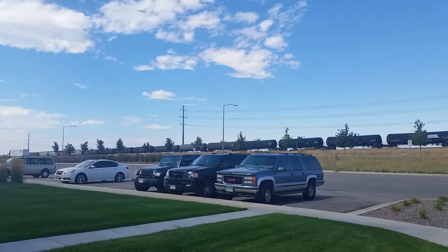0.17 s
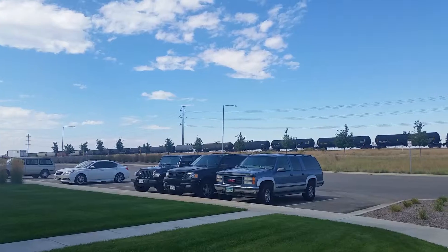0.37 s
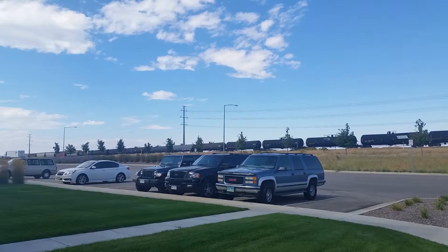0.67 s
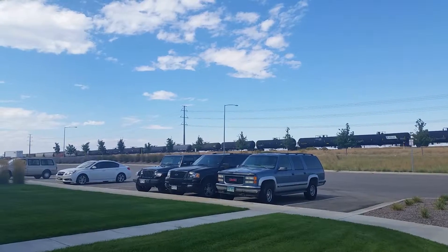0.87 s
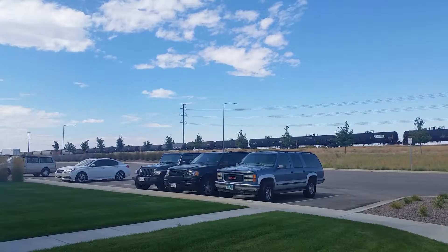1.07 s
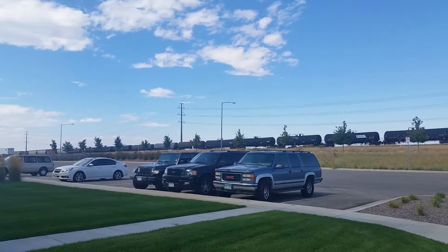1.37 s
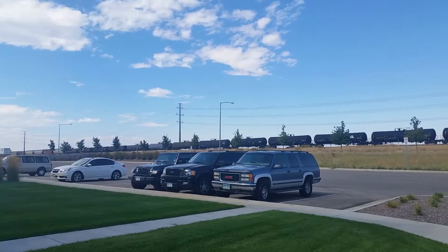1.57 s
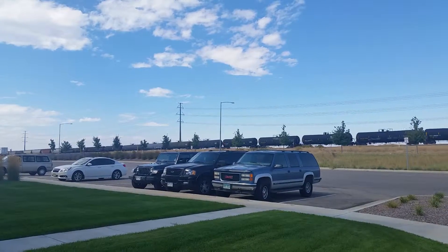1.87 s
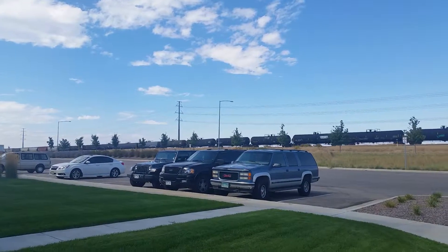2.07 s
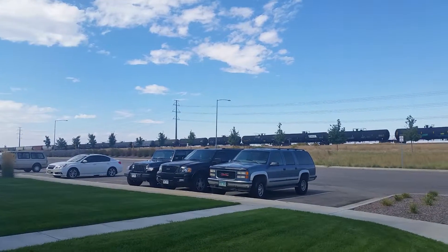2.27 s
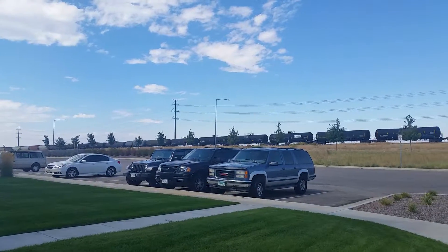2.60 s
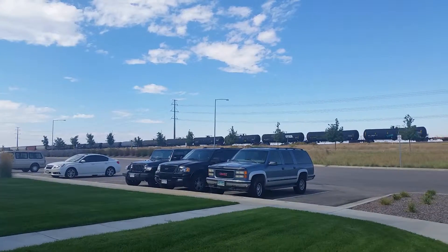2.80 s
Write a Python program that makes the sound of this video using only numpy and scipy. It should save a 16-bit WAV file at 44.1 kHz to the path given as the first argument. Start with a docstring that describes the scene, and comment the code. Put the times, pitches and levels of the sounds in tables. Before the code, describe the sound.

Distant heavy rail wagons rumble unevenly past an open car park, wheels rushing softly over rails.

```python
"""A car park, with a freight train rolling in the distance, heard by a microphone with two ports.
Filtered noise makes the deep rumble of heavy wagons, the rush of wheels on rails and a thin high hiss.
Two wavering tones hum, short bursts of noise are soft coupling rattles, brief tones are flange squeals.
Light wind stirs each port by itself; the right port is shaded and loses much of the treble.
"""
import sys
import numpy as np
from scipy import signal
from scipy.fft import rfft, irfft, next_fast_len
from scipy.io import wavfile
from scipy.ndimage import uniform_filter1d, map_coordinates

SR = 44100
rng = np.random.default_rng(int(sys.argv[2]) if len(sys.argv) > 2 else 0)


def generate_wav(sig):
    """Save sig (samples, or channels by samples) to the path in sys.argv[1] as 16-bit PCM at SR."""
    pcm = np.round(np.clip(np.atleast_2d(sig).T, -1, 1) * 32767).astype(np.int16)
    wavfile.write(sys.argv[1], SR, pcm)


N = 129654  # length in samples


def amp(db):
    """Decibels to gain."""
    return 10 ** (np.asarray(db) / 20)


def unit(x):
    """Scale to rms 1."""
    return x / np.sqrt(np.mean(x ** 2) + 1e-20)


def along(points, hz):
    """Read (frequency, value) points on a log frequency axis."""
    point_hz, values = np.transpose(points)
    return np.interp(np.log(hz + 1), np.log(point_hz + 1), values)


def curves(rows):
    """One value per sample for each column after the time."""
    time_s, *columns = np.transpose(rows)
    t = np.arange(N) / SR
    return [np.interp(t, time_s, column) for column in columns]


def wobble(rate):
    """A smooth random curve with this many knots a second."""
    knots = rng.standard_normal(int(N * rate / SR) + 4)
    return map_coordinates(knots, [np.arange(N) * rate / SR])


def filtered(x, response):
    """Multiply the spectrum of x by a response, which is a function of frequency."""
    size = next_fast_len(N + SR // 2)
    return irfft(rfft(x, size) * response(np.fft.rfftfreq(size, 1 / SR)), size)[..., :N]


# Likeness of far sound at the two ports: pitch_hz, likeness (0-1)
PORT_LIKENESS = [(30, .85), (60, 0.98), (120, 0.97), (220, 0.98), (330, 0.95), (400, 0.9), (540, 0.5),
                 (700, 0.8), (1000, 0.65), (1100, 0.5), (1450, 0.6), (1700, .65), (1850, .45), (2100, 0.8),
                 (2450, 0.1), (2850, 0.6), (4000, 0), (8000, 0.2)]


def noise_pair(spectrum, patchy_db, far=True):
    """Coloured noise of rms 1 with patches of random gain; far sound is partly shared by the ports."""
    grid = signal.stft(rng.standard_normal((2, N + SR // 10)), nperseg=1024)[2]
    patches = uniform_filter1d(rng.standard_normal(grid.shape[1:]), size=8, axis=0)  # across frequency
    patches = uniform_filter1d(patches, size=6, axis=1)  # across time
    pair = signal.istft(grid * amp(patchy_db * unit(patches)), nperseg=1024)[1]
    pair = pair[:, SR // 20:][:, :N]

    def mid_side(hz):
        # the cosine of twice this angle is the correlation of the ports
        angle = np.arccos(np.clip(along(PORT_LIKENESS, hz) * far, -1, 1)) / 2
        return amp(along(spectrum, hz)) * [np.cos(angle), np.sin(angle)]

    mid, side = filtered(pair, mid_side)
    return unit(np.array([mid + side, mid - side]))


EVEN_S, EVEN_SHARE = 0.045, 0.78  # averaging time; share of the power swells taken out (0-1)


def even(x):
    """Partly level the noise's chance swells, so that the level curves shape the rumble."""
    power = np.abs(uniform_filter1d(np.mean(x ** 2, axis=0), int(EVEN_S * SR))) + 1e-3
    return unit(x * power ** (-EVEN_SHARE / 2))


# Rumble levels before each band's trim: time_s, level_db
DEEP_RUMBLE_LEVEL = [(0.02, -27), (0.13, -29), (0.21, -17), (0.24, -29.5), (0.46, -21), (0.49, -27),
                     (0.56, -21), (0.75, -29.5), (0.81, -21), (0.84, -36.5), (0.87, -24), (1.09, -23),
                     (1.11, -34), (1.15, -16.5), (1.25, -29), (1.36, -22), (1.85, -24.5), (1.89, -19.5),
                     (1.97, -27), (2.15, -19.5), (2.2, -35), (2.26, -24), (2.31, -32.5), (2.35, -25.5),
                     (2.6, -29.5), (2.65, -19.5), (2.72, -34), (2.87, -17.5), (2.89, -25.5), (2.92, -17.5)]
MIDDLE_RUMBLE_LEVEL = [(0.02, -22), (0.04, -29.5), (0.14, -23.5), (0.17, -30.5), (0.2, -17.5),
                       (0.35, -22.5), (0.37, -27.5), (0.46, -23), (1.02, -26.5), (1.16, -21), (1.18, -30),
                       (1.23, -19), (1.3, -28), (1.33, -18.5), (1.46, -28), (1.55, -20), (1.63, -36.5),
                       (1.65, -26), (1.8, -23), (1.87, -32.5), (1.9, -21.5), (1.93, -31), (1.97, -21.5),
                       (2.14, -28.5), (2.6, -24), (2.62, -29), (2.69, -18.5), (2.72, -29), (2.79, -20.5),
                       (2.92, -25.5)]
UPPER_RUMBLE_LEVEL = [(0.02, -20.5), (0.16, -27), (0.21, -21.5), (0.38, -25), (0.41, -21.5), (0.54, -29),
                      (0.56, -24.5), (0.83, -24), (0.85, -30), (0.91, -26.5), (1.39, -23.5), (1.41, -30.5),
                      (1.53, -22), (1.59, -27.5), (1.76, -23), (1.88, -29), (1.9, -24), (1.97, -27),
                      (2.09, -22.5), (2.16, -28), (2.28, -22), (2.31, -25.5), (2.77, -22), (2.78, -25),
                      (2.9, -25), (2.92, -21)]
# Rumble colours, relative: pitch_hz, level_db (per Hz)
DEEP_RUMBLE_SPECTRUM = [(15, -48), (30, -19.5), (48, -13), (62, 2), (85, -2), (105, -11), (140, -20.5),
                        (300, -120)]
MIDDLE_RUMBLE_SPECTRUM = [(40, -67), (80, -15), (100, -1.5), (125, -1), (150, -7), (190, -25.5),
                          (400, -120)]
UPPER_RUMBLE_SPECTRUM = [(70, -72.5), (125, -27), (155, -4), (180, 0), (205, -5), (240, -9.5), (300, -11),
                         (390, -22), (520, -31), (900, -60), (2000, -120)]


def wagon_rumble():
    """Heavy wagons as three bands of low noise, each evened out and then given its own level curve."""
    deep_db, = curves(DEEP_RUMBLE_LEVEL)
    middle_db, = curves(MIDDLE_RUMBLE_LEVEL)
    upper_db, = curves(UPPER_RUMBLE_LEVEL)
    deep = amp(deep_db - 0.15) * even(noise_pair(DEEP_RUMBLE_SPECTRUM, patchy_db=-0.1))
    middle = amp(middle_db - 0.45) * even(noise_pair(MIDDLE_RUMBLE_SPECTRUM, patchy_db=0.5))
    upper = amp(upper_db - 0.9) * even(noise_pair(UPPER_RUMBLE_SPECTRUM, patchy_db=0.56))
    return deep + middle + upper


# Rush levels before trim and wavering.
# Low and high rush: time_s, low level_db, high level_db
LOW_HIGH_RUSH_LEVEL = [(0.02, -40.5, -47.5), (0.04, -38, -48), (0.35, -36.5, -46), (0.76, -40, -49.5),
                       (0.79, -39, -47), (0.92, -37.5, -49), (0.97, -37, -44.5), (1.06, -40, -48),
                       (1.61, -39, -48.5), (1.63, -44.5, -47.5), (1.68, -38.5, -49.5), (1.71, -38.5, -47),
                       (1.86, -41.5, -49.5), (1.87, -38.5, -48.5), (2.89, -38.5, -48.5), (2.92, -42.5, -48)]
# Middle rush: time_s, level_db
MIDDLE_RUSH_LEVEL = [(0.03, -41), (0.4, -40), (0.55, -40), (0.88, -41.5), (0.97, -42), (1.08, -42),
                     (1.6, -42.5), (1.76, -41.5), (2.1, -43), (2.36, -42), (2.43, -40), (2.55, -40.5),
                     (2.9, -41)]
# Bands beside the high rush: time_s, level_db under it, level_db over it
EDGE_RUSH_LEVEL = [(0.04, -55.5, -65.5), (0.39, -49.5, -62), (0.86, -51.5, -67), (0.96, -49, -67.5),
                   (0.98, -41, -66), (0.99, -47, -62), (1.45, -50.5, -65.5), (1.53, -54.5, -69.5),
                   (2.08, -49.5, -64.5), (2.12, -52.5, -65.5), (2.4, -54, -67.5), (2.41, -49, -64.5),
                   (2.56, -54, -67.5), (2.9, -54, -68)]
# Rush colours, relative: pitch_hz, level_db (per Hz)
LOW_RUSH_SPECTRUM = [(200, -52), (450, -16), (600, -4), (850, 0.5), (1050, -3), (1300, -7.5), (2000, -32.5),
                     (4000, -120)]
MIDDLE_RUSH_SPECTRUM = [(500, -55), (1000, -10.5), (1300, -4.5), (1550, -3), (1700, -1), (1950, -4.5),
                        (2100, -5.5), (2300, -7.5), (2600, -17.5), (2900, -32.5), (4000, -60.5),
                        (8000, -120)]
UNDER_RUSH_SPECTRUM = [(1500, -61), (2200, -9), (2550, -2.5), (2900, -6.5), (3200, -8), (4500, -61),
                       (9000, -120)]
HIGH_RUSH_SPECTRUM = [(1500, -70), (2900, -14.5), (3500, -2), (4200, -2.5), (5000, -11), (5800, -19.5),
                      (7000, -49.5), (9000, -120)]
OVER_RUSH_SPECTRUM = [(3000, -69.5), (5000, -7.5), (5800, -1), (6500, -4.5), (7400, -11), (8100, -37),
                      (9000, -56.5), (12000, -120)]


def wheel_rush():
    """Wheels rolling on rails as five bands of patchy noise that waver slightly together."""
    low_db, high_db = curves(LOW_HIGH_RUSH_LEVEL)
    middle_db, = curves(MIDDLE_RUSH_LEVEL)
    under_db, over_db = curves(EDGE_RUSH_LEVEL)
    low = amp(low_db + 1.94) * noise_pair(LOW_RUSH_SPECTRUM, patchy_db=0.47)
    middle = amp(middle_db + 5) * noise_pair(MIDDLE_RUSH_SPECTRUM, patchy_db=0.97)
    under = amp(under_db + 1.5) * noise_pair(UNDER_RUSH_SPECTRUM, patchy_db=0.8)
    high = amp(high_db + 6.0) * noise_pair(HIGH_RUSH_SPECTRUM, patchy_db=0.84)
    over = amp(over_db + 6.0) * noise_pair(OVER_RUSH_SPECTRUM, patchy_db=1.4)
    shared_db = 0.4 * wobble(9.45)
    return amp(shared_db) * (low + middle + under + high + over)


# Hum levels before the flutter: time_s, upper level_db, lower level_db
HUM_LEVELS = [(0.03, -62, -56), (0.22, -49, -52), (0.32, -61.5, -58), (0.7, -52.5, -57.5),
              (0.86, -47.5, -51.5), (1.15, -50, -45), (1.3, -49, -55), (1.53, -42.5, -60.5),
              (1.6, -48, -53.5), (1.75, -49, -54.5), (1.9, -58.5, -58), (2.25, -62, -46),
              (2.57, -56.5, -55), (2.66, -42, -42.5), (2.79, -43, -61), (2.9, -54.5, -55)]
HUM_HZ = (451.8, 414.3)  # centre pitches, upper and lower
HUM_DRIFT_HZ, HUM_FLUTTER_DB = 3, 2.5  # scales of the random drift and flutter


def hums():
    """Two narrow tones that drift in pitch, flutter and swell, alike at both ports."""
    total = np.zeros(N)
    for centre_hz, level_db in zip(HUM_HZ, curves(HUM_LEVELS)):
        pitch_hz = centre_hz + HUM_DRIFT_HZ * wobble(8)
        tone = np.sqrt(2) * np.sin(2 * np.pi * np.cumsum(pitch_hz) / SR)  # rms 1
        total += amp(level_db + HUM_FLUTTER_DB * wobble(15)) * tone
    return total


# Hiss level before its trim: time_s, level_db
HISS_SWELL = [(0.03, -82), (0.13, -80), (0.31, -73.5), (0.75, -77), (1.0, -71.5), (1.2, -71.5), (1.36, -72),
              (1.47, -81.5), (1.89, -85), (1.99, -77), (2.05, -72.5), (2.2, -82), (2.9, -82)]
# Hiss colour, relative: pitch_hz, level_db (per Hz)
HISS_SPECTRUM = [(8000, -82), (11000, -22), (12000, -7), (12800, -3), (13800, -10.5), (15000, -29),
                 (20000, -80.5)]


def hiss():
    """A thin band of high, patchy noise that swells and fades."""
    level_db, = curves(HISS_SWELL)
    return amp(level_db + 4.5) * noise_pair(HISS_SPECTRUM, patchy_db=3.0)


# Wind colour, relative: pitch_hz, level_db (per Hz)
WIND_SPECTRUM = [(10, -14.5), (35, -8.5), (70, -8), (150, -19), (400, -42), (1000, -120)]
WIND_DB = -38  # level before the gusting


def wind():
    """Light wind as low buffeting noise, independent at each port and in its gusting."""
    gusts_db = 2.0 * np.array([wobble(7.1), wobble(5.4)])
    return amp(WIND_DB + gusts_db) * noise_pair(WIND_SPECTRUM, patchy_db=3.5, far=False)


# Far coupling rattles, before their roughness: time_s of the middle, level_db
COUPLING_RATTLES = [(0.975, -49.5), (2.04, -53), (2.43, -47)]
# Rattle colour, relative: pitch_hz, level_db (per Hz)
RATTLE_SPECTRUM = [(300, -60), (1000, -5.5), (1800, 0.5), (2800, -5.5), (4000, -5.5), (5500, -14),
                   (7400, -27), (8200, -54), (12000, -120)]
RATTLE_S = 0.02  # from the middle of a burst to 1/e of its gain


def rattles():
    """Couplings rattle softly: short bell-shaped bursts of noise, made rough by a fast random gain."""
    t = np.arange(N) / SR
    swell = sum(amp(db) * np.exp(-((t - middle_s) / RATTLE_S) ** 2) for middle_s, db in COUPLING_RATTLES)
    return swell * amp(3 * wobble(170)) * noise_pair(RATTLE_SPECTRUM, patchy_db=1.0)


# Flange squeals, before their unsteadiness: start_s, length_s, pitch_hz, level_db (peak)
FLANGE_SQUEALS = [(1.15, .095, 6715, -58.5), (2.41, 0.075, 7355, -61)]
SQUEAL_RISE_S = 0.015  # fade at either end


def squeals():
    """Wheel flanges squeal faintly: short tones, slightly unsteady in level and phase."""
    t = np.arange(N) / SR
    total = np.zeros(N)
    for start_s, length_s, pitch_hz, level_db in FLANGE_SQUEALS:
        to_nearest_end_s = np.minimum(t - start_s, start_s + length_s - t)
        fade = np.clip(to_nearest_end_s / SQUEAL_RISE_S, 0, 1)
        tone = np.sin(2 * np.pi * pitch_hz * t + 0.6 * wobble(56))
        total += amp(level_db + 1.5 * wobble(50)) * fade * tone
    return total


def scene():
    """All sources summed before the microphone's own lag, shading and noise."""
    return wagon_rumble() + wheel_rush() + hums() + hiss() + wind() + rattles() + squeals()


# Phase by which the left port lags: pitch_hz, lag (radians)
LEFT_LAG = [(40, .1), (350, .05), (450, 0.38), (780, .2), (950, .8), (1100, 2.12), (1400, 1.2),
            (1750, 2.86), (2100, 5.48), (2450, 4.5), (2900, 5.8), (3300, 9.3), (5400, 25)]
# Gain of the shaded right port: pitch_hz, level_db
RIGHT_SHADE = [(30, -1.2), (90, 1.53), (200, 2), (330, 1.5), (500, 2.1), (700, 0.45), (950, -3),
               (1200, 0.2), (1550, -6.5), (2000, -0.5), (2300, -5.5), (2600, 0.5), (2900, -3.5),
               (3300, -15), (4000, -23.5), (5000, -17), (7000, -16.5), (7500, -22.5), (9000, 4),
               (12700, -6.5), (15000, -9.5)]
# Self-noise colour, relative: pitch_hz, level_db (per Hz)
SELF_NOISE_SPECTRUM = [(3000, -40), (8300, -13), (9800, -5), (10600, -8), (12500, -3), (14500, 0),
                       (15800, 0), (16200, -40)]
SELF_NOISE_DB = -77
TOP_HZ = 15760  # band limit


def record(dry):
    """The left port lags, the right is shaded; faint self-noise joins and the band limit cuts the top."""
    def ports(hz):
        return np.array([np.exp(-1j * along(LEFT_LAG, hz)), amp(along(RIGHT_SHADE, hz))])

    self_noise = amp(SELF_NOISE_DB) * noise_pair(SELF_NOISE_SPECTRUM, patchy_db=2.5, far=False)
    heard = filtered(dry, ports) + self_noise
    return filtered(heard, lambda hz: hz < TOP_HZ)


dry = scene()
out = record(dry)
generate_wav(out)
```